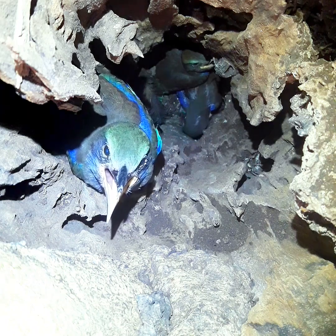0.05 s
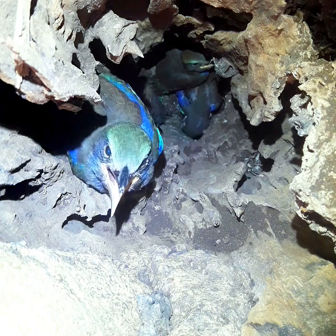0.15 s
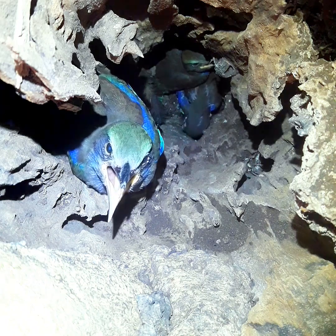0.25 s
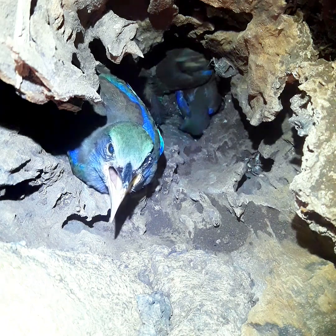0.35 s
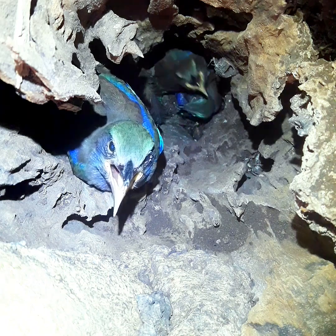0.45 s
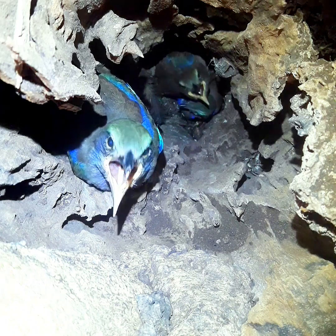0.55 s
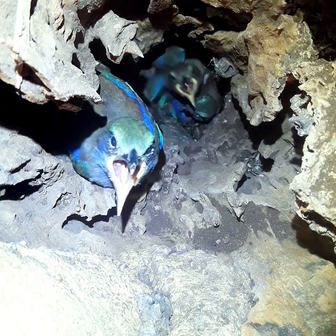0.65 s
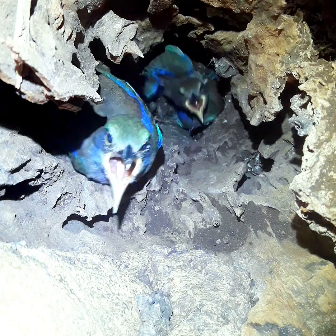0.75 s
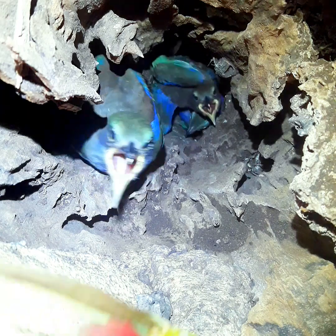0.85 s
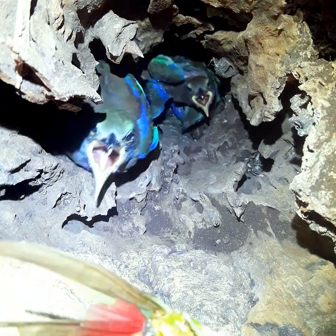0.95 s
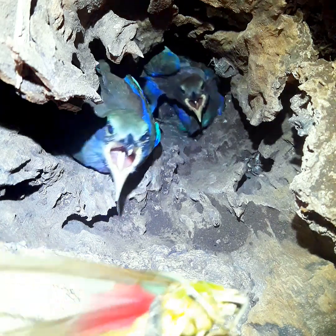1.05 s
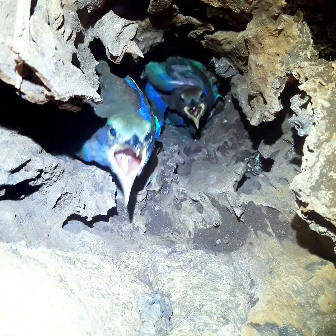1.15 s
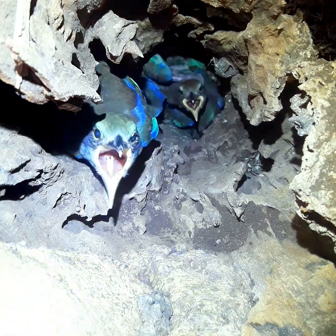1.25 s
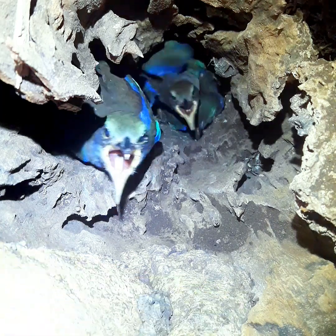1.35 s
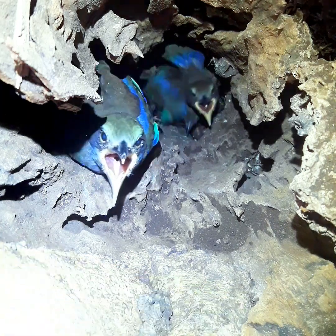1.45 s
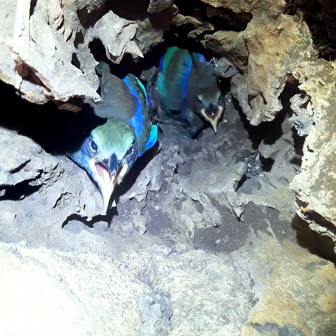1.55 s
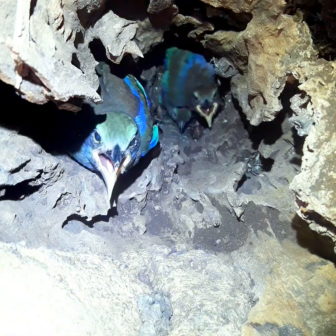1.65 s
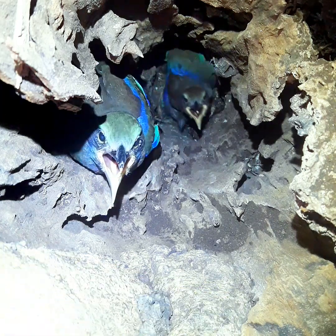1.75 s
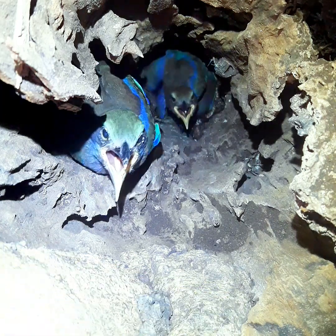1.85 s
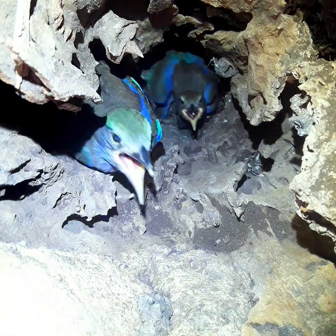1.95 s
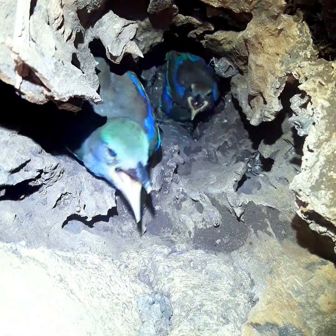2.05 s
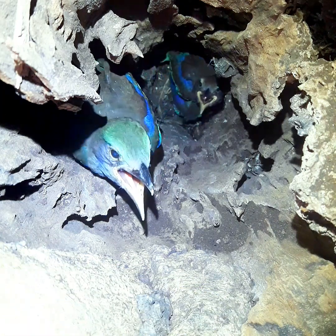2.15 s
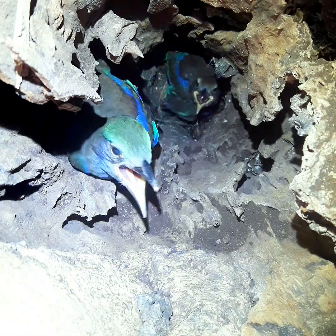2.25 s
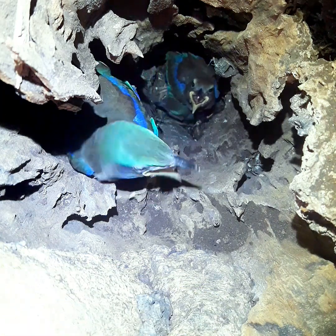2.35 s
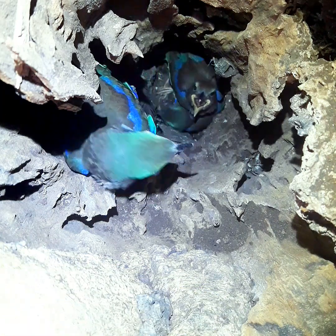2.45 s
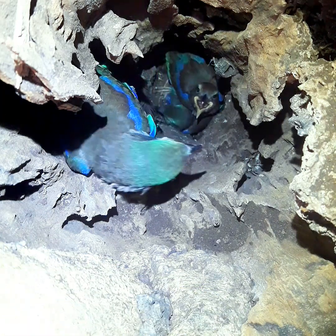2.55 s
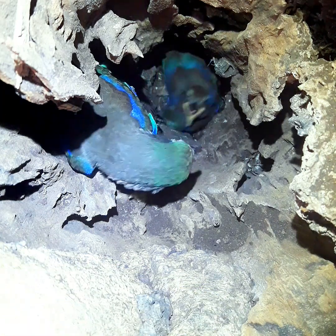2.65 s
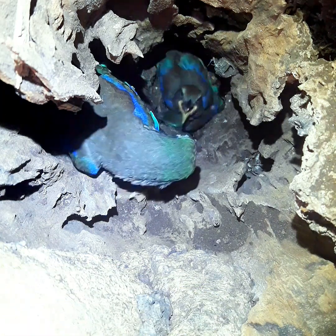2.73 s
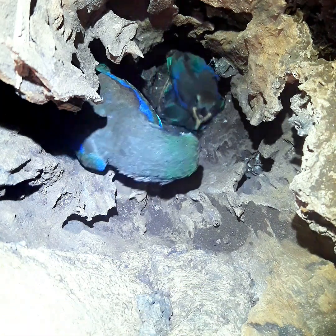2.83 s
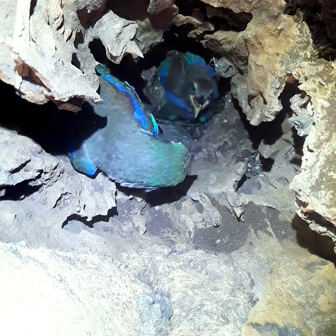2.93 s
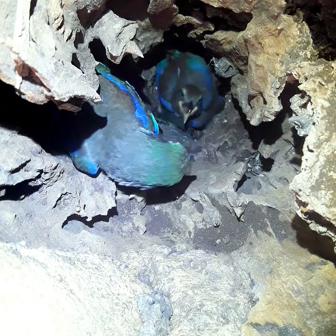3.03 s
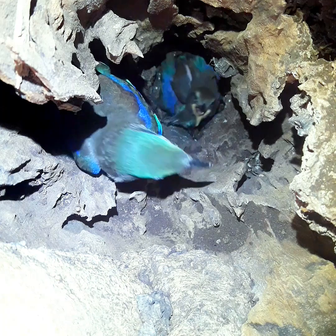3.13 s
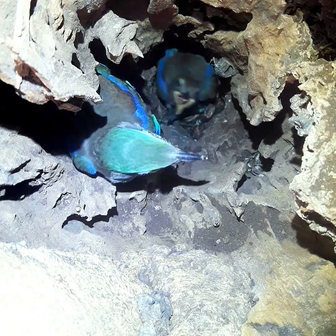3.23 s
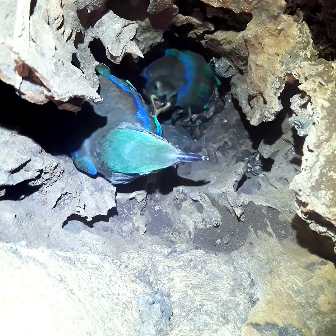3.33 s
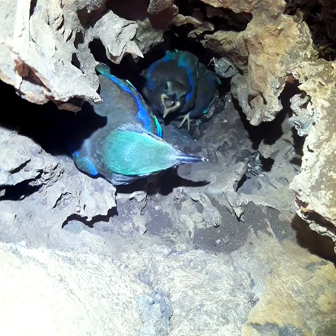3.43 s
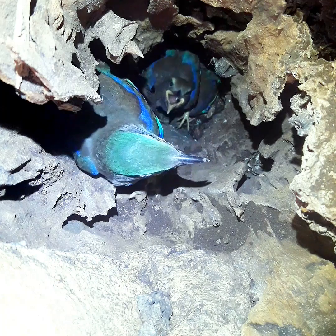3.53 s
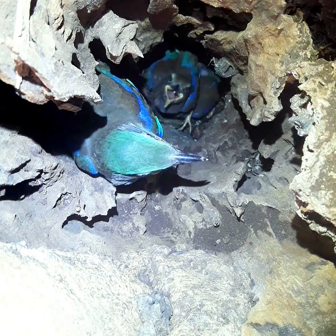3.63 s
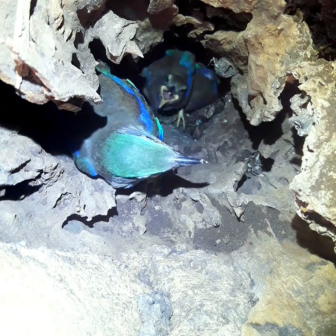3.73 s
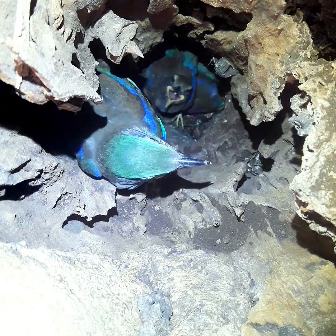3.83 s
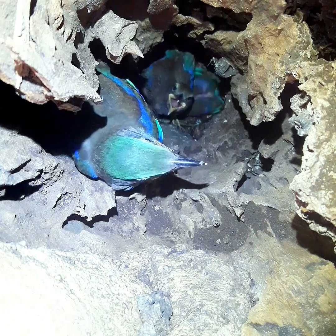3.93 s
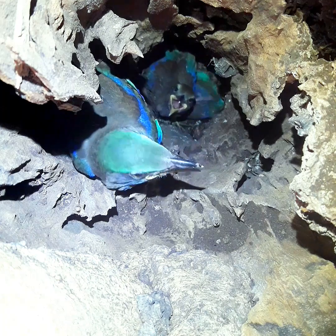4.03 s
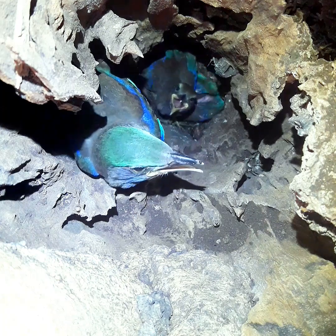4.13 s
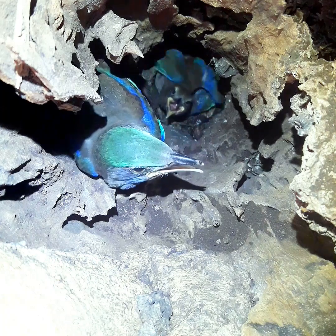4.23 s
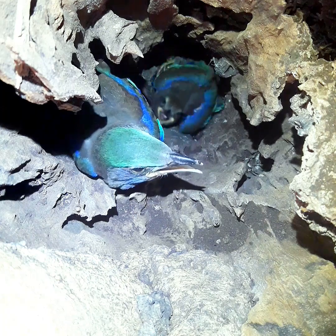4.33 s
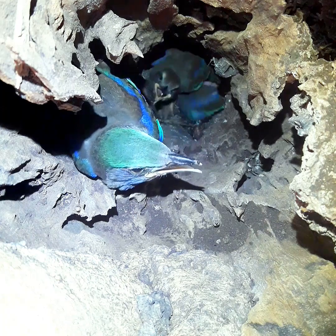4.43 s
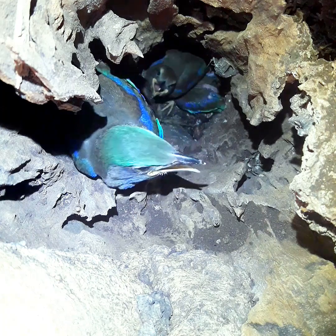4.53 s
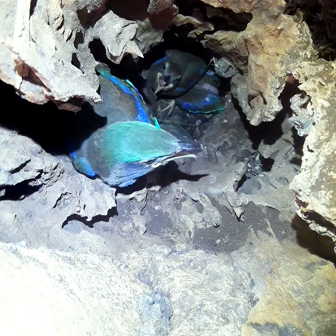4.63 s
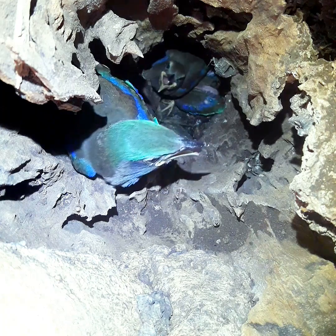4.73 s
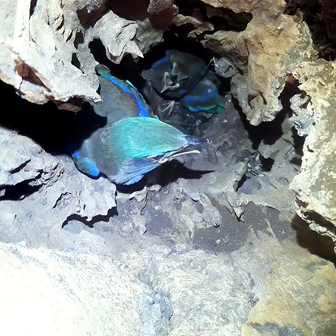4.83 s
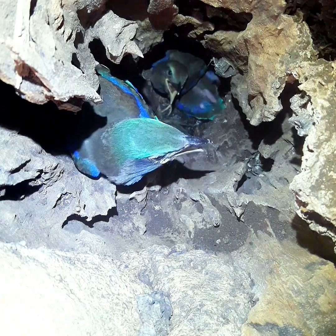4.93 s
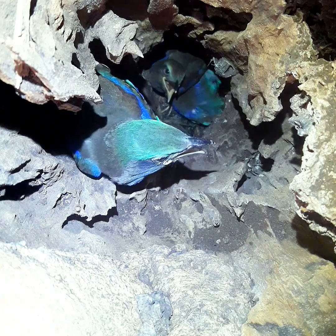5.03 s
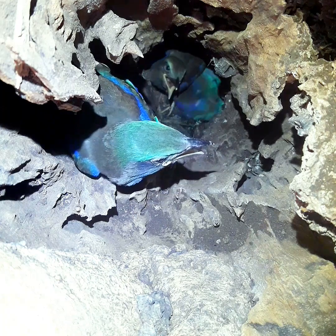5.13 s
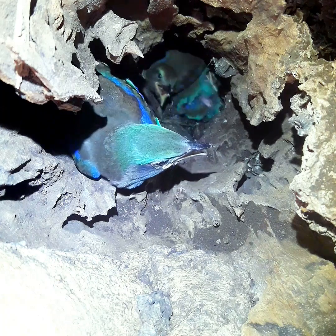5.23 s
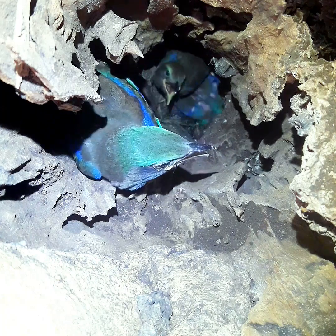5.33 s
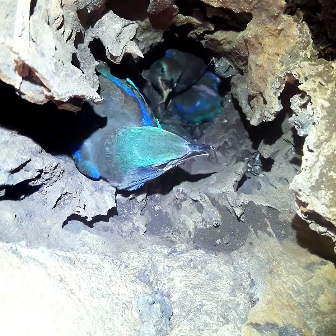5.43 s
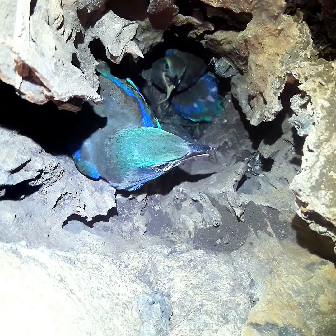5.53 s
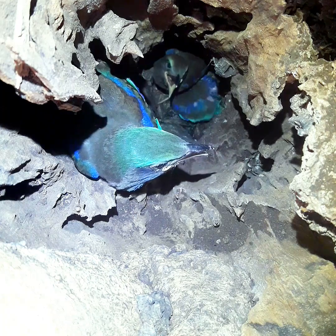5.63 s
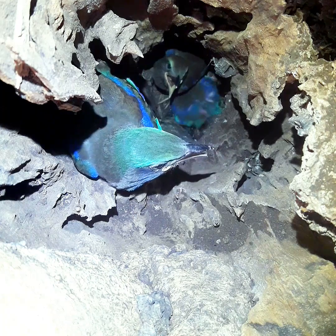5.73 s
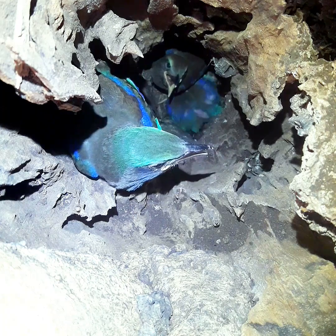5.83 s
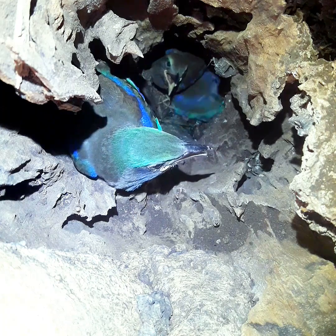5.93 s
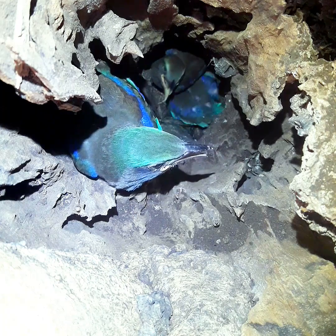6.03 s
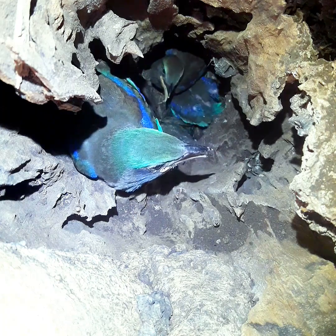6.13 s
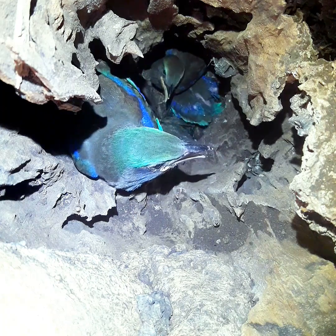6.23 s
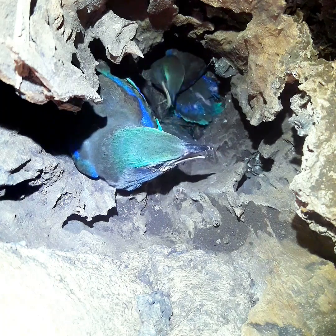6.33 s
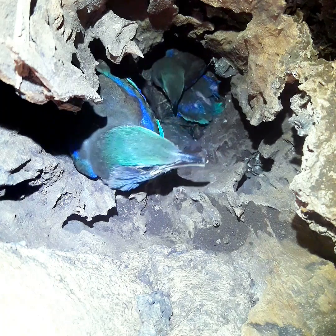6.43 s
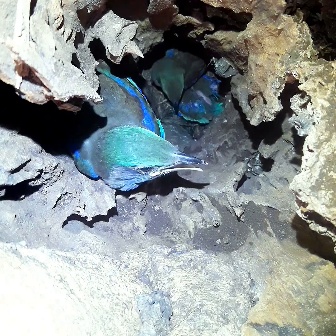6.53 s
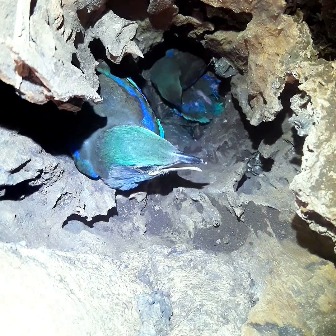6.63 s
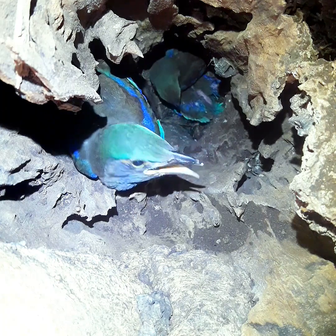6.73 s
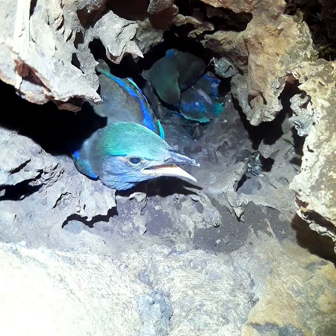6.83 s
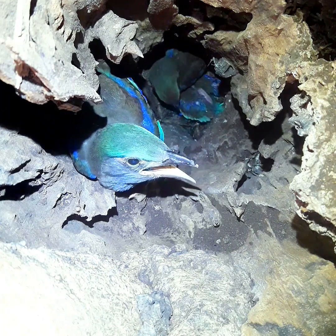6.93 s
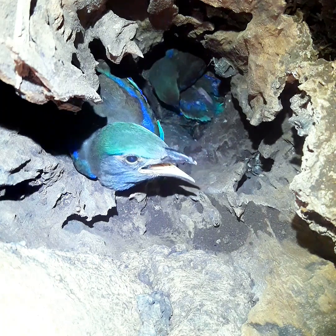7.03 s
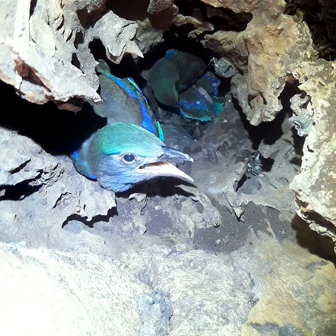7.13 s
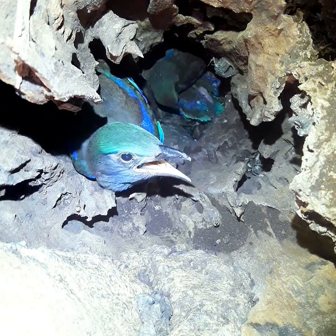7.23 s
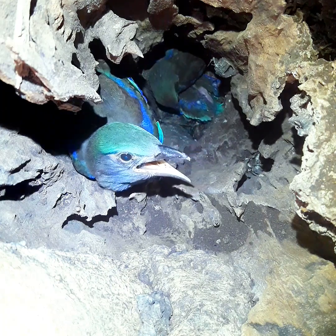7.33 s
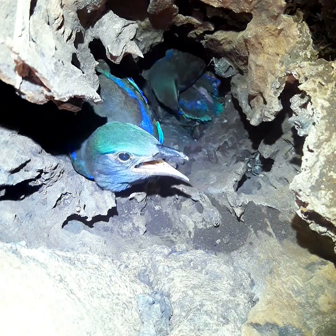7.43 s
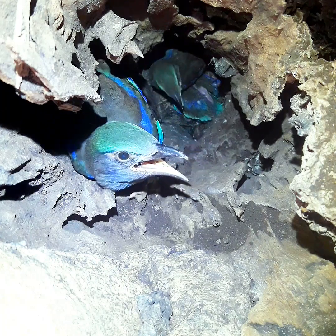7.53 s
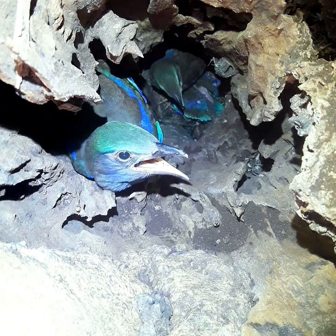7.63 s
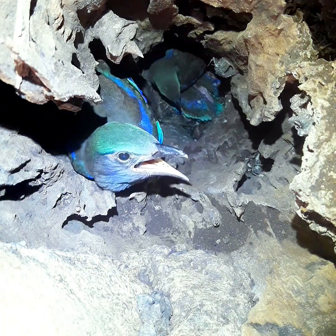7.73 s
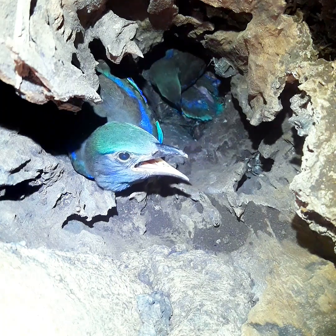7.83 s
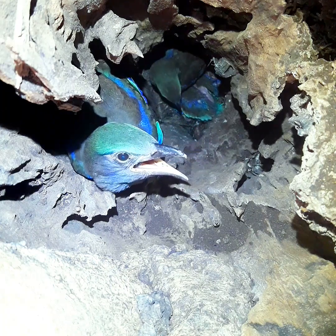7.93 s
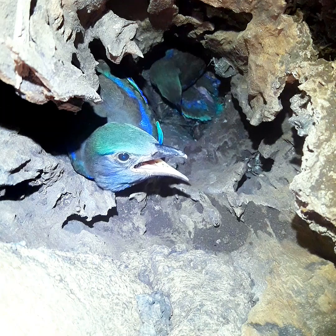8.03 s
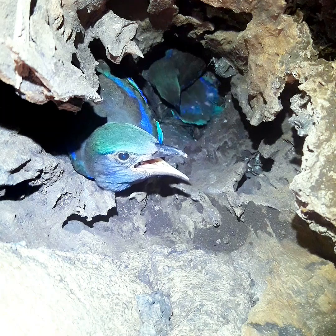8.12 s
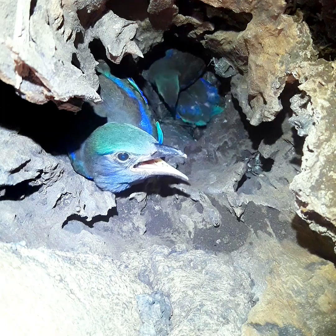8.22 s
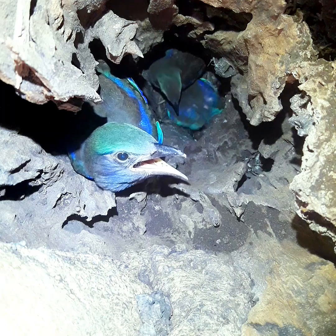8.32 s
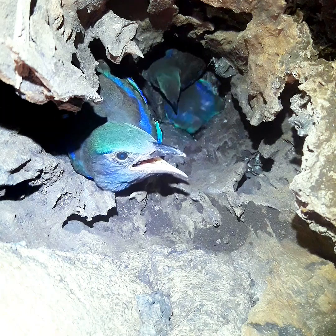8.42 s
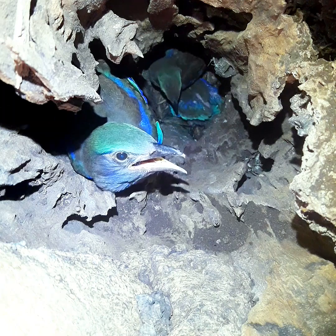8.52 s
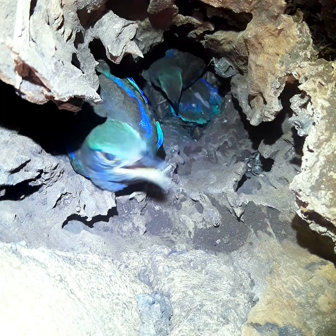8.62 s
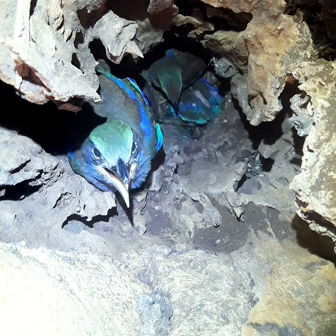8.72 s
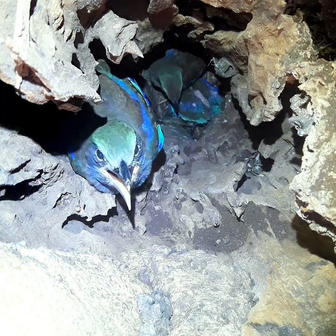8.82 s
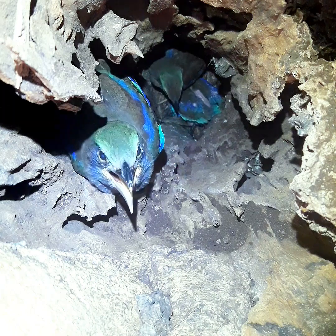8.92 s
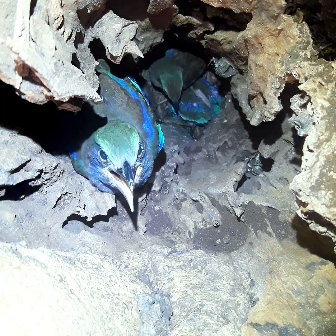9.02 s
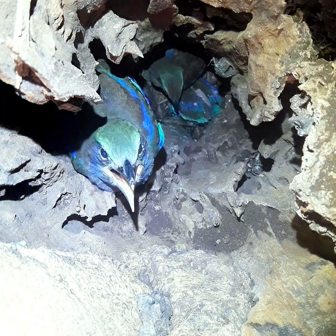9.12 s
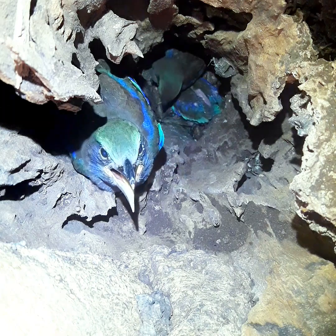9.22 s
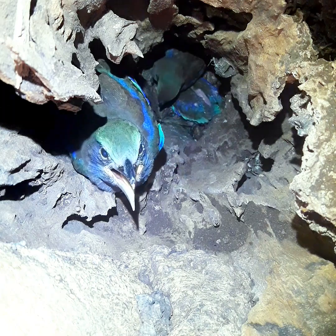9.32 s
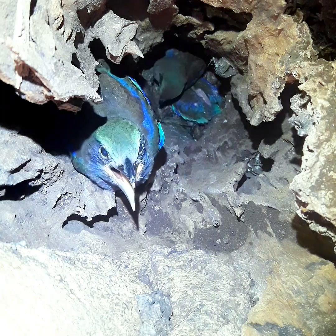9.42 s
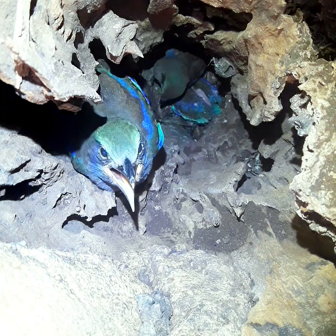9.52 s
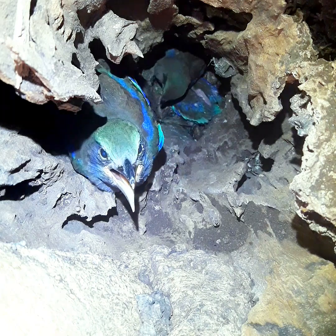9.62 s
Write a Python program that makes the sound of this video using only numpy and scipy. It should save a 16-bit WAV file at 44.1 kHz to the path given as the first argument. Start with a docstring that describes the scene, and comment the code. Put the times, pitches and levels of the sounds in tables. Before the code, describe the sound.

After a low outdoor rumble and a claw scrape, two young birds burst into rapid, overlapping hoarse squawks, close up in a stone cavity.

```python
"""First a low outdoor rumble and a scrape of claws, then two nestlings begging in a small rock hollow.
They are close to the microphone, one pitched above the other. Each call is a stack of gliding harmonics:
it slides up from a croak, holds an arched, raspy note and drops away again. Claws on stone are grains and
ticks of coloured noise, bumping bodies are short low noise bursts, and near the end a faint hum joins in."""
import sys
import numpy as np
from scipy import signal
from scipy.fft import rfft, irfft
from scipy.io import wavfile
from scipy.ndimage import uniform_filter1d, minimum_filter1d

SR = 44100
rng = np.random.default_rng(int(sys.argv[2]) if len(sys.argv) > 2 else 0)


def wav_out(sig):
    """Save sig, one row per channel (or a flat mono array), as 16-bit PCM at SR to the path in sys.argv[1]."""
    wavfile.write(sys.argv[1], SR, np.round(np.clip(np.atleast_2d(sig).T, -1, 1) * 32767).astype(np.int16))


N = 426447

# Levels below are relative, trimmed later by each source's own settings, unless noted.
# higher chick, one row a call: start_s, end_s, top_pitch_hz, crest_place (0-1 of the held note),
#   sag_share (0-1 of the pitch lost after the crest), effort_db, fade_db (negative swells), rasp_db
HIGH_CALLS = [(0.23, 0.509, 2205, 0.14, 0.14, -31, 9, -17.5),
              (0.522, 0.731, 2208, 0.15, 0.0053, -26.0, -4.5, -11),
              (0.731, 0.925, 2543, 0.29, 0.24, -25, 10, -13.5),
              (0.911, 1.067, 2588, 0.29, 0.14, -20.5, 2.5, -12.5),
              (1.079, 1.259, 2580, 0.35, 0.38, -25, 3.5, -10),
              (1.279, 1.421, 2254, 0.48, 0.12, -28, 10, -7), (1.449, 1.594, 2412, 0.24, 0.11, -36, 1, -15),
              (1.637, 1.807, 2243, 0.23, 0.079, -27.5, 1.5, -7.5),
              (1.835, 2.007, 2310, 0.34, 0.11, -24.5, 8, -1),
              (2.027, 2.185, 2281, 0.087, 0.073, -23.5, -1, -10),
              (2.218, 2.396, 2265, 0.29, 0.1, -27, 8, -10), (2.433, 2.624, 1930, 0.19, 0.16, -23, 7, -11.5),
              (2.67, 2.848, 1759, 0.24, 0.06, -19, 17, -9.5), (2.874, 3.052, 2004, 0.43, 0.14, -28, -7, -3),
              (3.098, 3.279, 2024, 0.38, 0.11, -28, 1, -6.0), (3.305, 3.475, 2015, 0.42, 0.17, -27, 7, -8),
              (3.504, 3.705, 1992, 0.41, 0.16, -29.5, 4.5, -4.5),
              (3.742, 3.953, 1927, 0.29, 0.09, -33, -5, -12),
              (3.981, 4.214, 1930, 0.27, 0.15, -32.5, 2, -9.5),
              (4.226, 4.42, 1994, 0.32, 0.13, -31, 3.5, -13), (4.46, 4.68, 2003, 0.17, 0.2, -32.5, 0, -14),
              (4.72, 4.927, 1929, 0.074, 0.16, -31, 1, -15),
              (4.973, 5.165, 1849, 0.21, 0.12, -30.5, -4, -14.0),
              (5.664, 5.886, 1815, 0.6, 0.043, -37.5, -6.5, -27),
              (5.909, 6.099, 1861, 0.37, 0, -32, -3.5, -13.0),
              (6.14, 6.372, 1854, 0.54, 0.075, -36.0, -6.5, -9.5),
              (6.447, 6.678, 1906, 0.4, 0.023, -33.5, -10, -14),
              (6.698, 6.888, 1962, 0.21, 0.035, -31, -0.5, -19.5),
              (6.941, 7.156, 1990, 0.27, 0.055, -33, 5, -23),
              (7.169, 7.379, 2015, 0.39, 0.057, -33.5, -8.5, -4.5),
              (7.447, 7.68, 1959, 0.54, 0.035, -34, 1, -10.5),
              (7.682, 7.888, 1993, 0.55, 0.06, -33.5, -8, -12),
              (7.954, 8.166, 1961, 0.38, 0.03, -34.5, 0, -15.5),
              (8.218, 8.428, 1968, 0.52, 0.012, -36.5, 4.5, -11.5),
              (8.609, 8.836, 1984, 0.42, 0.052, -38.5, -4, -6.5),
              (8.849, 9.042, 2108, 0.24, 0.081, -36, -1, -19.0),
              (9.075, 9.283, 2100, 0.36, 0.05, -34, -0.5, -16),
              (9.342, 9.568, 2135, 0.26, 0.085, -34, -2, -9.5),
              (9.642, 9.786, 2083.0, 0.14, 0.0, -39.5, 16, -8.0)]
# lower chick, one row a call: start_s, end_s, top_pitch_hz, sag_share (0-1), effort_db,
#   fade_db (negative swells), rasp_db
LOW_CALLS = [(0.486, 0.684, 1798, 0.017, -36.5, 0, -11), (0.705, 0.86, 1719, 0.16, -30.5, 6, 16),
             (0.904, 0.972, 1700.0, 0.0, -32.5, -11, 2), (1.008, 1.106, 1707, 0.034, -31, -6, 5),
             (1.094, 1.22, 1303, 0.11, -39, -3.5, -28), (1.199, 1.262, 1559, 0.18, -34, -2.5, 11),
             (1.31, 1.413, 1610.0, 0.24, -46, 6, -13), (1.462, 1.592, 1580, 0.11, -46, 3, 7),
             (1.588, 1.7, 1562, 0.074, -35.5, -6.5, -10), (1.707, 1.817, 1544, 0.1, -31.5, -1, 10),
             (1.838, 1.942, 1614, 0.0, -28.0, 2, 11.5), (1.952, 2.055, 1566, 0.056, -32, -8.5, 1),
             (2.069, 2.184, 1650, 0.066, -30.5, 2, -1), (2.204, 2.337, 1650, 0.054, -30.5, 2, -6),
             (2.345, 2.457, 1660, 0.067, -29.5, -2.5, -13), (2.472, 2.618, 1601.0, 0.15, -31.5, 4.5, -19),
             (2.604, 2.708, 1698.0, 0.066, -30, 1, -16.0), (2.75, 2.837, 1706, 0.094, -21.5, 3.5, -19),
             (2.87, 3.036, 1532, 0.0097, -35.5, 17.5, 10), (3.012, 3.108, 1520, 0.0065, -32, 3.5, -10),
             (3.141, 3.265, 1517, 0.016, -32, 4, -3), (3.27, 3.345, 1560, 0.088, -33.5, 4, 3.0),
             (3.389, 3.476, 1610, 0.04, -32.0, 2.5, -16), (3.501, 3.6, 1528, 0.07, -34.5, 0, 18),
             (3.617, 3.698, 1398, 0, -33.5, -2, -12), (3.723, 3.835, 1500, 0.11, -33.5, -8, -1),
             (3.859, 3.956, 1531.0, 0.011, -35, 8, -26), (3.978, 4.084, 1486, 0.018, -37.5, -8.5, -12),
             (4.118, 4.205, 1586, 0.065, -39, 7, -8), (4.234, 4.342, 1546.0, 0.19, -38, -6.5, -6),
             (4.381, 4.49, 1417, 0.035, -36, -0.5, -7.5), (4.501, 4.606, 1320, 0.0033, -36, -6, -4),
             (4.637, 4.742, 1372, 0.086, -34, 2.5, -8), (4.767, 4.889, 1445, 0.0092, -33.5, 7, -20),
             (4.902, 5.031, 1533, 0.067, -32.5, -5, -1.5), (5.084, 5.207, 1536, 0.0, -31, 3.5, -5),
             (5.21, 5.335, 1408, 0.1, -33.5, -3.5, -3.5), (5.357, 5.466, 1493, 0.028, -32, 5, -4),
             (5.479, 5.596, 1417, 0.075, -35, 2, -4), (5.615, 5.747, 1496, 0.16, -35.0, 3.5, -7),
             (5.76, 5.902, 1495, 0.077, -36, -3.5, -20), (5.934, 6.074, 1543, 0.017, -33.5, -3.5, -15),
             (6.399, 6.583, 1685.0, 0.14, -37.5, -8, -10), (6.572, 6.705, 1590, 0.0067, -32.5, -1, -8),
             (6.797, 6.915, 1648, 0.025, -34.0, -3, -2.0), (6.969, 7.103, 1655, 0.046, -37, -6.5, -3),
             (7.111, 7.257, 1642, 0.084, -34.5, -1.5, 3), (7.271, 7.433, 1625, 0.079, -37.5, -9, -10),
             (7.461, 7.586, 1607, 0.084, -36, -9.5, -7), (7.604, 7.755, 1560, 0.086, -34.5, -5, -4.5),
             (7.775, 7.916, 1615, 0.13, -36.0, 3.5, 9), (8.502, 8.675, 1617, 0.05, -37.5, -18.5, 8),
             (8.838, 8.964, 1680.0, 0.058, -37, -4.5, -4), (9.094, 9.273, 1678, 0.056, -38.5, -6, 9),
             (9.318, 9.494, 1686, 0.059, -37, -7.5, 7), (9.558, 9.616, 1406, 0.06, -42, -9.5, 6)]
# higher chick's overtones against its fundamental: time_s, second_harmonic_db, third_harmonic_db
#   (the third also sets those above it)
HIGH_OVERTONES = [(.3, 2.5, 2.5), (1.3, 3, 0), (2.25, 8.5, 6), (2.75, -6, 0.5), (3.2, 1, 0.5), (4.4, 2, 1),
                  (5.1, 1.5, -2), (5.8, 1.5, -11.5), (6.7, 0, -3), (8.3, -2, -2), (8.8, 1, 0),
                  (9.3, -1, 3.5)]
# the same for the lower chick: time_s, second_harmonic_db, third_harmonic_db
LOW_OVERTONES = [(.6, -16, -6.5), (1.05, -1, -1), (2.1, -3.5, -11), (2.8, -5, -8), (3.6, 5, -3),
                 (4.4, 6.5, -1.5), (4.8, -3.5, -7.5), (6, -1, -7.5), (6.5, -20, -16.5), (7.6, -8, -6),
                 (9.4, -14.5, -11)]
# colour of throat, open beak and hollow together: frequency_hz, level_db
THROAT_COLOUR = [(300, -8.5), (550, 4.5), (760, -14), (1000, 0.5), (1250, -7.5), (1600, 1.5), (2000, -6.5),
                 (2550, -8), (3100, 5.5), (4400, -2.5), (5800, 7.5), (6700, -11.5), (7800, -28.5),
                 (10500, -29), (15500, -34)]
# narrow resonances of the hollow, lifting or cutting harmonics that glide through:
#   centre_hz, width_hz, level_db
HOLLOW_MODES = [(1840, 55, 0), (2150, 50, 2.5), (2840, 330, -3), (3410, 110, -2), (4370, 120, 4),
                (5200, 320, -0.5), (5204, 57, 1), (7180, 360, 8)]
# claws and beaks ticking on stone: time_s, peak_db
TICKS = [(0.1436, -67), (0.3236, -45), (0.3441, -58), (0.604, -38), (0.7103, -50), (1.1443, -36),
         (1.273, -59), (1.425, -57), (2.4034, -40), (2.795, -47), (4.6766, -50), (7.6076, -53),
         (7.7897, -47), (7.906, -54), (8.0306, -46), (8.4672, -54)]
# shuffling over grit: time_s, level_db
SHUFFLE_LEVEL = [(0.13, -83), (0.151, -59.5), (0.45, -59), (0.55, -68.5), (0.72, -72), (0.95, -75),
                 (1.15, -67), (1.42, -58.5), (1.47, -67), (1.8, -109), (1.9, -66), (2.6, -100), (2.8, -59),
                 (2.9, -83), (5.5, -88), (7.4, -100), (7.8, -86), (8.1, -90)]
# colour of claws on stone: frequency_hz, level_db (per Hz)
CLAW_COLOUR = [(300, 0.5), (1500, 21), (3000, 16.5), (5500, 27.5), (8000, 5.5), (12000, 10), (15500, 5.5)]
# bodies and wings bumping the nest floor: time_s, peak_db
BUMPS = [(0.399, -27), (0.479, -35), (1.273, -28.5), (1.434, -25), (2.359, -35), (2.753, -23.5),
         (2.817, -28), (3.018, -29), (3.132, -25.5), (4.202, -31.5), (4.519, -30.5), (4.76, -37),
         (5.278, -36), (5.49, -31), (5.849, -34), (8.349, -54), (8.468, -35.5)]
# colour of the outdoor background: frequency_hz, level_db (per Hz)
OUTDOOR_COLOUR = [(25, -19), (75, 0), (105, -5), (170, 2), (260, -3), (480, -5), (800, -12.5), (1500, -18),
                  (3000, -21.5), (6000, -26), (8500, -44), (15500, -30.5)]
# background level, with a brief dip: time_s, rms_level_db (full scale)
OUTDOOR_LEVEL = [(0, -44), (1.44, -52), (1.48, -70), (1.58, -58.5), (1.7, -48), (3.7, -54), (5.6, -51.5),
                 (6.6, -54), (8.3, -52), (9.6, -52)]
# faint hum like a far engine, climbing and then easing: time_s, firing_rate_hz, level_db
#   (peak of its strongest partial, full scale)
HUM = [(7.4, 58.2, -64), (7.899, 73, -59.5), (8.45, 78.8, -54), (8.9, 75.6, -63)]
SHIMMER_DB = 2  # rms wander of each overtone's level
EDGE_HZ = 15900  # upper edge of the finished sound


def amp(db):
    """Turns decibels into gain."""
    return 10 ** (np.asarray(db) / 20)


def unit(x):
    """Scales to rms 1."""
    return x / np.sqrt(np.mean(x ** 2) + 1e-20)


def add(mix, start_s, sound):
    """Adds a sound into the mix at a time."""
    part = mix[max(round(start_s * SR), 0):][:len(sound)]
    part += sound[:len(part)]


def colour(x, points):
    """Filters by a spectrum drawn through (frequency_hz, level_db) points."""
    hz, db = np.transpose(points)
    bins_hz = np.fft.rfftfreq(len(x), 1 / SR)
    curve_db = np.interp(np.log(bins_hz + 1), np.log(hz), db)
    return irfft(rfft(x) * amp(curve_db), len(x))


def band(x, lo_hz, hi_hz):
    """Keeps one band, with soft edges."""
    hz = np.fft.rfftfreq(len(x), 1 / SR) + 1e-3
    loss = np.sqrt((1 + (lo_hz / hz) ** 6) * (1 + (hz / hi_hz) ** 6))
    return irfft(rfft(x) / loss, len(x))


def wander(size, lo_hz, hi_hz):
    """Draws random motion between two rates, about rms 1."""
    return unit(band(rng.standard_normal(SR // 2), lo_hz, hi_hz))[:size]


def high_chick():
    """Clear, arched calls whose rasp repeats every three cycles of the syrinx (period tripling)."""
    voice = dict(
        rise=.021, fall=.026,  # seconds
        # pitch, as shares of the top pitch
        scoop=.42, droop=.34, droop_per_sag=1.2, bend=1.2, climb=.3, whine=.00206, waver=.0074,
        # rasp: dB offsets, then its cycle count and depths
        rasp_db=-3.5, catch_db=22, clearing_db=5, patchy_db=6.5,
        count=3, buzz=1., swing=.22, hiss_db=-13,
        # overtones and loudness
        top_db=-2.5, top_slope_db=3.0, dull_db=6.0,
        db=-.5, swell_db=2.0, opening_db=12.5, snap=.96, closing_db=33, tremble_db=1.57)
    out = np.zeros(N)
    for row in HIGH_CALLS:
        add(out, row[0], call(*row, HIGH_OVERTONES, voice))
    return out


def low_chick(crest=.3973):
    """Shorter, hoarser calls with period doubling, which begin and end in a deep croak."""
    voice = dict(
        rise=.03, fall=.028,  # seconds
        # pitch, as shares of the top pitch
        scoop=.78, droop=.56, droop_per_sag=.3, bend=1.3, climb=.1515, whine=.02, waver=.015,
        # rasp: dB offsets, then its cycle count and depths
        rasp_db=-5, catch_db=5, clearing_db=-7.0, patchy_db=8.5,
        count=2, buzz=1.1, swing=.1, hiss_db=-15,
        # overtones and loudness
        top_db=-4, top_slope_db=.9, dull_db=6.0,
        db=1.27, swell_db=5.5, opening_db=10, snap=2.4, closing_db=12, tremble_db=2.5)
    out = np.zeros(N)
    for start, end, top_hz, sag, effort, fade, rasp in LOW_CALLS:
        add(out, start, call(start, end, top_hz, crest, sag, effort, fade, rasp, LOW_OVERTONES, voice))
    return out


def call(start, end, top_hz, crest, sag, effort, fade, rasp_level, overtone_curve, voice):
    """One call: the syrinx tightens from a croak, arches over a held note, buzzes, and goes slack."""
    t = np.arange(start, end, 1 / SR)
    size = len(t)
    on, off = start + voice["rise"], end - voice["fall"]

    # the held note climbs gently to its crest and then sags
    held = ((t - on) / (off - on)).clip(0, 1)
    crest = np.clip(crest, .05, .9)
    climbing = (crest - held).clip(0)
    sagging = ((held - crest) / (1 - crest)).clip(0)
    arch = 1 - voice["climb"] * climbing ** 2 - sag * sagging ** 1.5
    # a call that starts softly starts as a higher whine
    arch = arch + voice["whine"] * max(-fade, 0) * climbing

    # slackness is 0 on the held note and 1 at either end; it lowers pitch and loudness and dulls the tone
    opening = ((on - t) / voice["rise"]).clip(0, 1)
    closing = ((t - off) / voice["fall"]).clip(0, 1)
    slack = opening + closing
    droop = min(voice["droop"] + voice["droop_per_sag"] * sag, .7)
    hz = top_hz * arch * (1 - voice["scoop"] * opening ** 2 - droop * closing ** voice["bend"])
    wavering_hz = hz * (1 + voice["waver"] * wander(size, 9.6, 43))
    phase = 2 * np.pi * np.cumsum(wavering_hz) / SR

    # rasp comes in patches and shifts over the note
    patches = wander(size, 5, 22)
    rasp_db = rasp_level + voice["rasp_db"] + voice["catch_db"] * opening
    rasp_db = rasp_db - voice["clearing_db"] * (held - .5) + voice["patchy_db"] * patches
    rasp = amp(np.minimum(rasp_db, -2))
    # the membranes repeat only every few cycles, which sets lines between the harmonics
    beat = phase / voice["count"] + .4 * wander(size, 15, 80)
    grit = .27 * wander(size, 60, 800)  # the irregular share
    flutter = (1 + rasp * (voice["buzz"] * np.cos(beat) + grit)) / np.sqrt(1 + rasp ** 2 / 2)
    phase = phase + rasp * (voice["swing"] * np.sin(beat) + .18 * wander(size, 50, 300))

    # harmonics 2 to 8, each swelling and dipping on its own
    time_s, second, third = np.transpose(overtone_curve)
    second_db = np.interp(t.mean(), time_s, second)
    third_db = np.interp(t.mean(), time_s, third)
    upper_db = third_db + voice["top_db"] - voice["top_slope_db"] * np.arange(5)
    overtones = np.zeros(size)
    for order, db in enumerate(np.r_[second_db, third_db, upper_db], start=2):
        level = amp(db + SHIMMER_DB * wander(size, 6.3, 40))
        overtones += level * np.cos(order * phase + 2 * np.pi * rng.random())
    tone = np.cos(phase) + overtones * amp(-voice["dull_db"] * slack)
    hiss = amp(voice["hiss_db"]) * rasp * rng.standard_normal(size)

    # loudness swells towards the middle of the note and leans by the call's fade
    loud_db = effort + voice["db"] + voice["tremble_db"] * wander(size, 11.2, 58.7)
    loud_db = loud_db - voice["swell_db"] * (2 * held - 1) ** 2 - fade * (held - .5)
    loud_db = loud_db - voice["opening_db"] * opening ** voice["snap"]
    loud_db = loud_db - voice["closing_db"] * closing ** 2.17
    return np.sqrt(2) * amp(loud_db) * (tone * flutter + hiss) * signal.windows.tukey(size, .03)


def ringing(x):
    """Lifts or cuts the bands around the hollow's resonances."""
    hz = np.fft.rfftfreq(N, 1 / SR)
    curve_db = sum(db * np.exp(-((hz - centre) / width) ** 2) for centre, width, db in HOLLOW_MODES)
    return irfft(rfft(x) * amp(curve_db), N)


def claws(grit_db=3, tick_db=-1, grains_per_s=2200, spread_db=4.5, clump_db=4.5):
    """Clumps of grit, random grains of noise, crunch under shuffling feet, with a few sharp ticks."""
    grains = rng.standard_normal(N) * (rng.random(N) < grains_per_s / SR)
    grains = grains * amp(spread_db * rng.exponential(1, N).clip(0, 4))
    clumps_db = clump_db * unit(band(rng.standard_normal(N), 3.1, 27))
    shuffle_db = np.interp(np.arange(N) / SR, *np.transpose(SHUFFLE_LEVEL))
    level = amp(shuffle_db + grit_db + clumps_db)
    grit = (unit(grains) + .5 * rng.standard_normal(N)) * level
    ticks = amp(tick_db) * blows(TICKS, decay_s=.001)
    return colour(grit + ticks, CLAW_COLOUR)


def bumps(bump_db=10):
    """Dull, short thuds: noise bursts kept to the low band."""
    return amp(bump_db) * band(blows(BUMPS, decay_s=.0105), 62, 810)


def blows(rows, decay_s):
    """Each blow is a burst of noise that dies exponentially."""
    out = np.zeros(N)
    t = np.arange(SR // 5) / SR
    for time_s, db in rows:
        add(out, time_s, amp(db) * np.exp(-t / decay_s) * rng.standard_normal(len(t)))
    return out


def hollow(x, wet_db=-9, t60_s=.035):
    """Close rock walls return a quick spray of echoes, so gliding harmonics swell and dip."""
    t = np.arange(SR // 6) / SR
    sparse = rng.standard_normal(len(t)) * (rng.random(len(t)) < .1)
    taps = sparse * (t > .001) * amp(-60 * t / t60_s)
    return x + amp(wet_db) * signal.oaconvolve(x, taps / np.linalg.norm(taps))[:N]


def outdoors():
    """Low coloured noise, with a faint hum of three partials locked to one gliding rate."""
    t = np.arange(N) / SR
    air = unit(colour(rng.standard_normal(N), OUTDOOR_COLOUR))
    air = air * amp(np.interp(t, *np.transpose(OUTDOOR_LEVEL)))
    time_s, hz, db = np.transpose(HUM)
    phase = 2 * np.pi * np.cumsum(np.interp(t, time_s, hz)) / SR
    hum = np.sin(2 * phase) + .5 * np.sin(5 * phase) + .5 * np.sin(6 * phase)
    return air + hum * amp(np.interp(t, time_s, db, left=-np.inf, right=-np.inf))


def scene():
    """Both chicks and their shuffling in the hollow, over the background."""
    chicks = ringing(colour(high_chick() + low_chick(), THROAT_COLOUR))
    return (hollow(chicks + claws() + bumps()) + outdoors())[None]


def record(dry):
    """A fast limiter holds down the loudest peaks, then a low-pass sets the upper edge."""
    ceiling = .48  # share of full scale
    gain = minimum_filter1d(np.minimum(1, ceiling / (abs(dry[0]) + 1e-9)), size=300)
    limited = dry * uniform_filter1d(gain, size=300)
    low_pass = signal.firwin(511, EDGE_HZ, window=("kaiser", 9), fs=SR)
    return signal.oaconvolve(limited, low_pass[None], "same")


dry = scene()
out = record(dry)
wav_out(out)
```